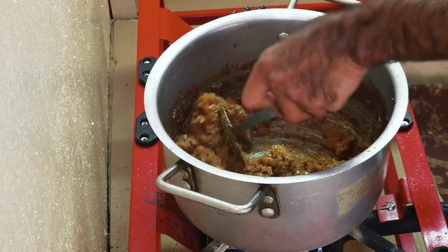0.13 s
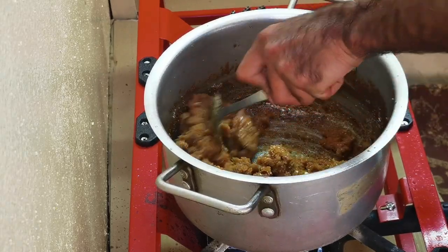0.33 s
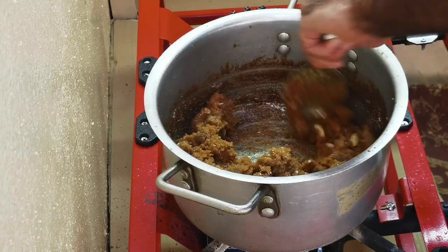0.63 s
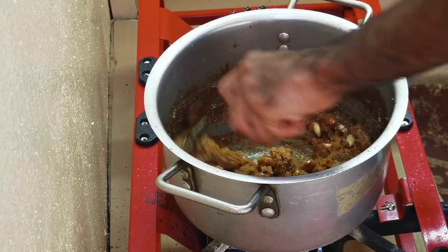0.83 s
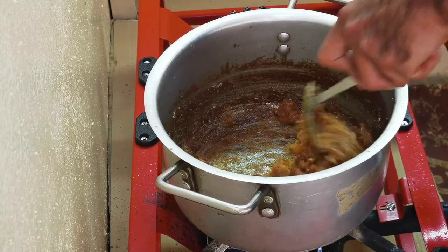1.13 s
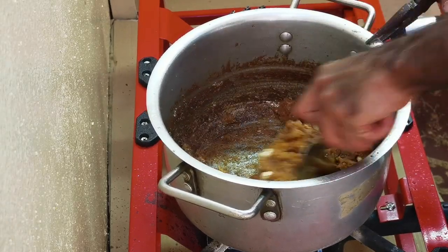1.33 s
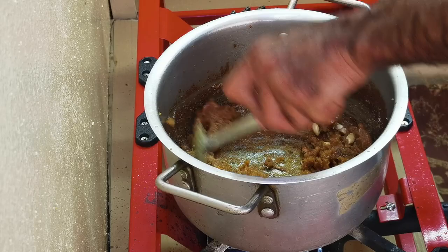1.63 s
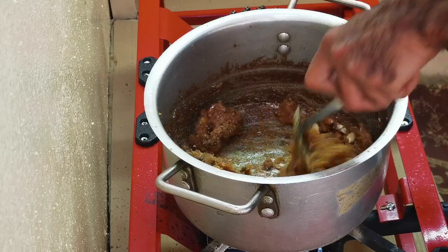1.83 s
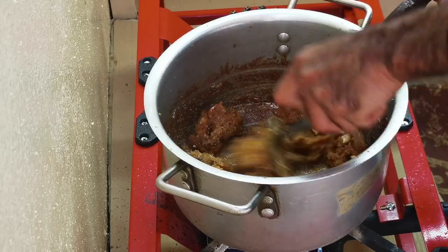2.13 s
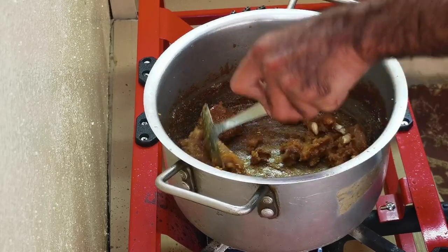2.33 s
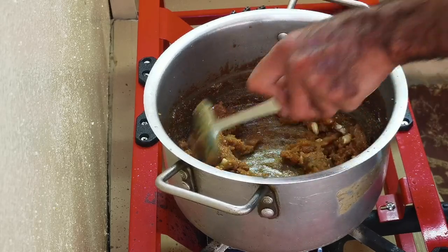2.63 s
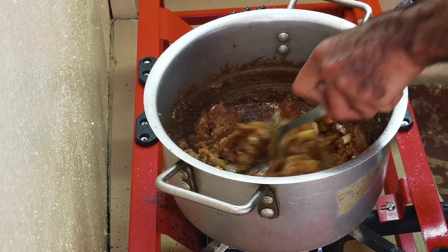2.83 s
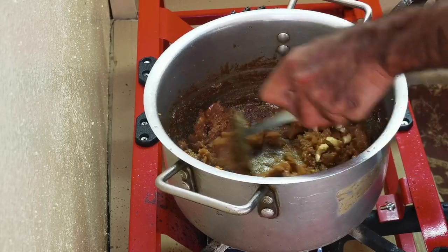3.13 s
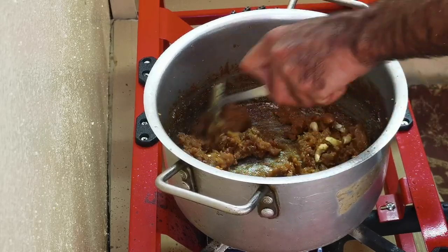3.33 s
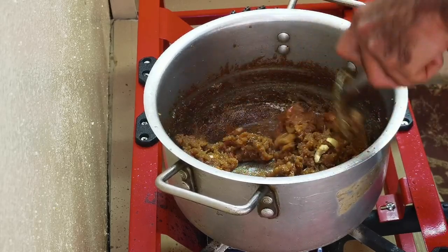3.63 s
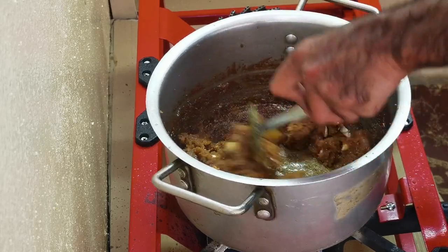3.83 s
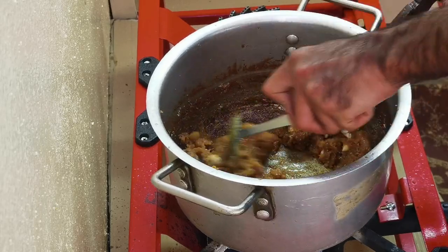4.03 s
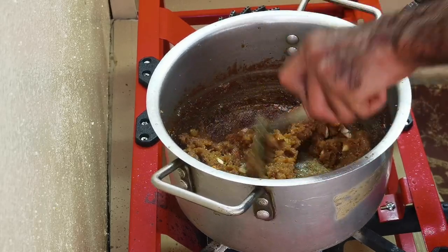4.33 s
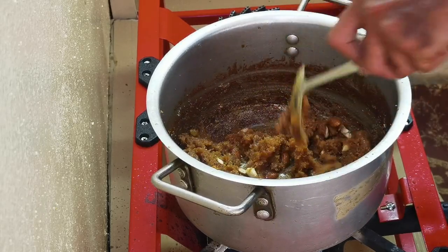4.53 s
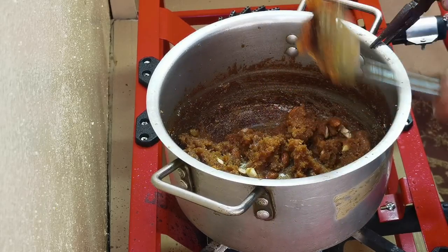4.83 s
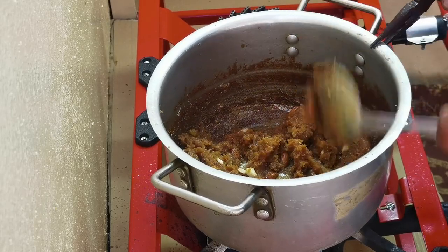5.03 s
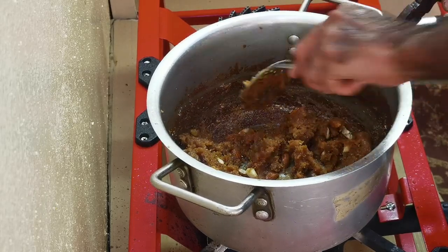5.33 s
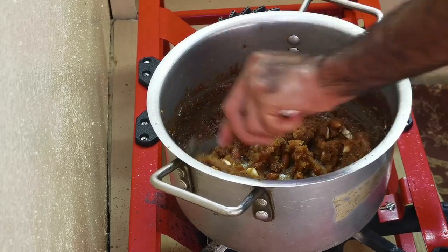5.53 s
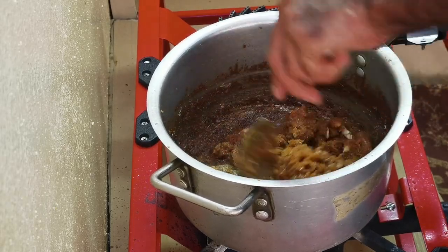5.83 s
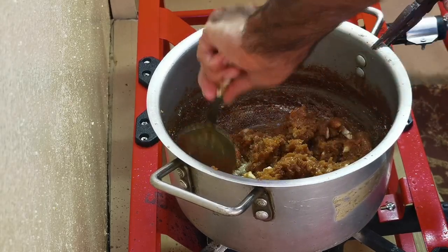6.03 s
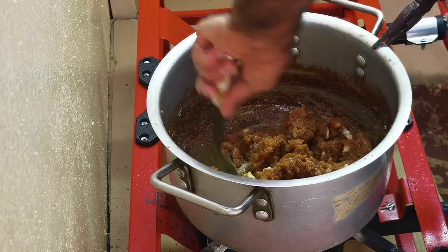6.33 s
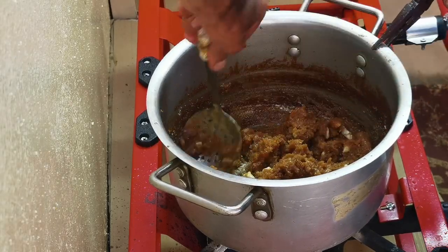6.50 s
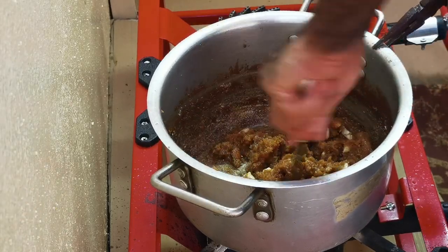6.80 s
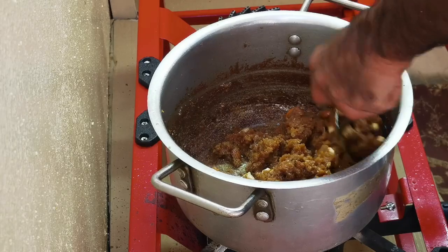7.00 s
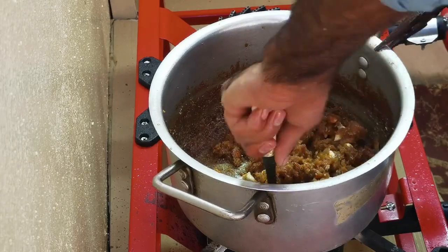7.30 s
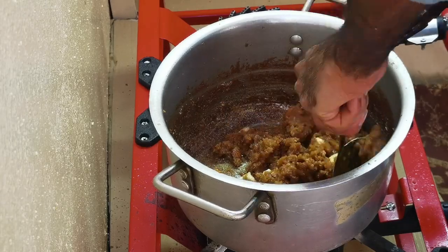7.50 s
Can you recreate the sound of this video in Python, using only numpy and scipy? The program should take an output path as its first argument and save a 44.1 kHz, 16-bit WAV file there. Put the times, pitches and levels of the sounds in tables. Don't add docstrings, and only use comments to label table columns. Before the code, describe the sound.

Thick paste fries in a metal pot, hissing and spitting over a low gas roar. A metal spoon begins with a rapid cluster of firm thuds, drags along the base and knocks in bursts, jolting the pot on its stand. Two hard rim clanks ring out late, then quieter frying carries scuffs, short metallic slides and gritty ticks. Close microphone, pot slightly left, short hard-room reflections.

```python
import sys
import numpy as np
from scipy import signal
from scipy.io import wavfile

SR = 44100
rng = np.random.default_rng(int(sys.argv[2]) if len(sys.argv) > 2 else 0)


def int16_out(signal):
    q = np.round(np.clip(np.atleast_2d(signal).T, -1, 1) * 32767)
    wavfile.write(sys.argv[1], SR, q.astype(np.int16))


def invert_db(x):
    u = np.asarray(x, float) / 20
    return 10 ** u


N = 337806
SIDES = np.array([[1], [-1]])

# pitch_hz, level_db (per Hz)
FLAME_SPECTRUM = [(13, -35), (22, 25), (97, 28), (124, 7), (166, -39.5), (263, -31), (300, -13), (390, -29),
                  (660, -120)]
FLAME_DB = -50.5

# pitch_hz, left_minus_right_db
LEAN = [(60, -1.5), (180, 0), (550, -6), (1650, 4.5), (4970, 0.5), (15000, 1)]
# pitch_hz, likeness (0 to 1)
LIKENESS = [(60, 1), (130, 0.95), (290, 0.9), (640, 0.96), (1410, 0.6), (3100, 0.79), (6000, 0.82),
            (9000, 0.74), (15000, 0.85)]

# time_s, level_db
HEAT = [
    (0, -44),
    (1.4, -40),
    (3.0, -47),
    (4.1, -43.5),
    (4.95, -48),
    (5.5, -51.5),
    (7.66, -47.5),
]
# peak_s, rise_s, fall_s, sizzle_db, spit_db
FLARES = [(.1, 0.048, 0.051, -31.5, -62), (.21, 0.11, 0.024, -33, -33), (.62, 0.48, 0.12, -37.5, -36.5),
          (.88, 0.011, 0.21, -35.5, -54), (1.62, 0.16, 0.37, -38.5, -69), (2.2, 0.19, 0.78, -41.5, -56),
          (2.92, 0.085, 0.06, -40, -60), (3.2, 0.077, 0.062, -36, -36.5), (3.54, 0.13, 0.1, -37, -46),
          (3.88, 0.02, 0.025, -30.5, -61), (5.03, 0.012, 0.2, -31, -52), (5.18, 0.19, 0.037, -37.5, -39),
          (5.24, 0.011, 0.14, -34, -42), (5.565, 0.0026, 0.018, -38.5, -44),
          (7.146, .004, 0.019, -39.5, -43), (7.31, 0.0041, 0.023, -42, -61), (5.79, 0.14, 0.057, -36, -46),
          (5.578, .004, 0.018, -48, -50), (6.08, 0.011, 0.093, -41, -68), (6.29, 0.069, 0.064, -37, -36.5),
          (6.47, 0.021, 0.093, -34, -39), (6.55, 0.052, 0.049, -35, -31), (6.81, 0.14, 0.13, -38, -38.5),
          (6.97, 0.18, 0.27, -39.5, -69), (7.52, 0.058, 0.1, -36.5, -40), (7.6, 0.035, 0.04, -34.5, -55)]
# pitch_hz, level_db (per Hz)
SIZZLE = [(710, -38.5), (1200, -55), (1430, -7), (1600, 1), (2040, 0), (2400, -1), (2870, -0.5),
          (3820, 1.5), (4910, 1), (6250, 4.5), (7520, -8.5), (9310, -50), (11000, -13), (14300, -48),
          (22000, -120)]
# pitch_hz, level_db (per Hz)
SPIT = [(6180, 16.5), (10500, 1), (11300, -5.5), (12600, 12), (13800, 6), (15100, 9), (15800, -5)]
# pitch_hz, level_db, t60_s
HOLLOW = [(1010, -2.5, 0.075), (1490, 4.5, 0.031), (1937, 2.5, 0.038), (2075, -4, 0.061)]
HOLLOW_DB = -11

# pitch_hz, level_db, t60_s
WALL = [(290, -10, 0.021), (308, -5.5, 0.19), (345, -9, 0.32), (403.3, 6.5, 0.1), (449, -1, 0.12),
        (499, 6, 0.068), (532.3, 6.5, 0.13), (630, -8, 0.038), (690, -8.5, 0.048)]
# pitch_hz, level_db, t60_s
UPPER = [(768.5, -8, 0.21), (850, 7.5, 0.02), (914, -11, 0.25), (1011, 10.5, 0.069), (1134, -11, 0.12),
         (1234, -6, 0.18), (1347, 4, 0.052), (1475, -0.5, 0.13), (1538, -8, 0.11), (1733, 0.5, 0.034),
         (2000, 1, 0.078), (2383, 4, 0.038)]
# pitch_hz, level_db, t60_s
STAND = [(59, -27, 0.42), (70.4, -2.5, 0.17), (101.6, -6.5, 0.72), (142.6, -12.5, 0.37), (105.24, -6, 0.97),
         (163.5, -18, 0.43), (172.4, -10.5, 0.59), (199.1, -10, 0.23)]

# time_s, level_db
PRESS = [
    (0, -43.5),
    (2.9, -44.5),
    (4.8, -48.5),
    (6.0, -47.5),
    (6.45, -48),
    (6.6, -58),
    (6.75, -47),
    (7.66, -56),
]
# peak_s, rise_s, fall_s, low_wall_db, upper_wall_db
PULLS = [(.17, 0.057, 0.053, -23, -32), (1.07, 0.23, 0.1, -38.5, -42.5), (1.45, 0.071, 0.13, -33.5, -39),
         (1.75, 0.036, 0.16, -40, -38.5), (2.22, 0.052, 0.16, -29.5, -37), (2.62, 0.16, 0.12, -30.5, -45.5),
         (4.05, 0.071, 0.39, -45.5, -48.5), (5.235, 0.03, 0.038, -25.5, -38), (5.4, 0.22, 0.1, -41.5, -40),
         (6.1, 0.07, 0.52, -39, -52), (6.98, 0.25, 0.4, -42.5, -47.5), (7.57, 0.14, 0.26, -34, -43)]
LOW_PRESS_DB, UPPER_PRESS_DB = -4, -57.5
# peak_s, rise_s, fall_s, level_db
ROCKS = [(.25, .08, 0.16, -31), (1.45, 0.27, 0.5, -26.5), (1.69, 0.24, 0.3, -53), (2.49, 0.14, 0.92, -48),
         (4.05, 0.054, 0.059, -19), (4.5, .2, 0.23, -60), (5.26, 0.079, 0.12, -16.5),
         (5.72, 0.15, 0.27, -33.5), (6.13, 0.038, 0.3, -32), (7.0, 0.45, 0.77, -34.5),
         (7.45, 0.26, 0.13, -25.5)]
STAND_REST_DB = -53

# middle_s, length_s, level_db (rms), centre_hz
SCUFFS = [(0.185, 0.06, -18, 486), (0.447, 0.2, -28.5, 2170), (0.612, 0.16, -35.5, 477),
          (0.982, 0.37, -38, 2000), (1.091, 0.039, -24, 517), (1.644, 0.1, -22.5, 500),
          (1.514, 0.043, -28.5, 485), (1.444, 0.031, -25, 480), (2.22, 0.03, -13.5, 456),
          (2.648, 0.23, -30.5, 440), (2.849, 0.05, -35, 1060), (3.216, 0.083, -29, 405),
          (3.528, 0.26, -43, 850), (3.937, 0.26, -24, 433), (5.127, 0.097, -32.5, 1030),
          (5.31, 0.076, -23, 490), (5.787, 0.2, -25, 483), (5.777, 0.11, -29.5, 1300),
          (6.088, 0.038, -20.5, 1200), (6.287, 0.064, -26.5, 860), (6.493, 0.19, -41, 1320),
          (6.829, 0.091, -17.5, 756), (7.063, 0.051, -25, 447), (7.491, 0.034, -33, 1880),
          (7.592, 0.066, -32, 1920), (6.937, 0.11, -36, 2310)]
SLIDE = 0.25

# start_s, length_s, level_db
SINGS = [(0.097, 0.032, -20), (0.14, 0.031, -30.5), (5.03, 0.023, -17.5), (5.195, 0.025, -19.5),
         (4.898, 0.053, -47), (4.727, 0.087, -50.5), (1.581, 0.021, -31), (1.61, 0.016, -28.5),
         (1.421, 0.023, -33), (5.66, 0.07, -49), (5.99, 0.036, -54), (7.407, 0.018, -22),
         (2.495, .05, -40.5), (5.091, 0.049, -28), (5.213, 0.095, -29), (5.348, 0.055, -34),
         (6.359, 0.043, -48), (6.444, 0.054, -29.5), (6.497, 0.12, -40), (6.787, 0.065, -27.5),
         (6.832, 0.043, -33), (6.918, 0.028, -40), (7.052, 0.041, -29.5), (7.304, 0.055, -40.5),
         (7.473, 0.057, -30.5), (7.552, 0.033, -27), (7.601, 0.019, -26.5), (7.607, 0.021, -32.5),
         (7.648, 0.033, -38.5)]
# pitch_hz, level_db, t60_s
SING_MODES = [(1007.5, -4.5, 0.15), (1036, -4.5, 0.073), (1465, -16, 0.02), (2000, -23, 0.014)]

GLIDE_STARTS = [.055, 3.88, 5.05, 5.06, 5.73, 5.785, 6.085, 6.1, 6.27, 6.275, 6.46, 6.795, 6.8, 7.575, .096,
                .162, 2.203, 2.445, 2.573, 5.65, 6.47, 6.22, 6.08, 6.615]
# length_s, level_db, from_hz, to_hz
GLIDES = [(0.025, -37, 1470, 1480), (0.032, -38, 1200, 1200), (0.059, -33.5, 349, 324),
          (0.072, -34, 250, 216), (0.0415, -34, 600, 1100), (0.065, -30, 420, 280), (0.078, -42, 1260, 640),
          (0.073, -36, 193, 165), (0.063, -32.5, 1100, 1200), (0.055, -27, 500, 604),
          (0.0408, -36, 330, 303), (0.06, -23, 800, 640), (.07, -31.5, 1300, 1150),
          (0.056, -43, 4200, 4600), (0.0128, -31, 1900, 1900), (0.041, -40, 1900, 1850),
          (.03, -39, 2100, 1250), (0.099, -43.5, 2000, 2000), (0.043, -38.5, 2000, 1450),
          (0.13, -59, 2050, 1700), (.04, -51, 1200, 1100), (0.061, -49, 1350, 1300),
          (0.027, -42, 1400, 1500), (0.028, -44, 1450, 1400)]
GLIDE_WIDTH = 0.073

# start_s, peak_db, rattle_length_s
CLANKS = [(0.873, -33, 0.0092), (2.191, -30.5, 0.026), (2.573, -22, 0.005), (3.883, -27, 0.006),
          (1.425, -26, .008), (2.206, -31, .005), (5.02, -20, .012), (5.178, -15, 0.014),
          (5.284, -20, 0.015), (5.03, -8, 0.013), (5.187, -7.5, 0.015)]
# start_s, peak_db, length_s
TICKS = [(6.0026, -35, 0.003), (6.078, -30, 0.003), (6.25, -33, 0.003), (6.286, -18, 0.0034),
         (6.4147, -31, 0.003), (6.454, -19, 0.003), (6.805, -23, 0.003), (7.155, -35, 0.003),
         (7.168, -27, 0.003), (7.309, -34, 0.003), (7.344, -31, 0.003), (7.411, -25, 0.0034),
         (7.482, -30, 0.003)]
TICK_DB = -3
# pitch_hz, level_db (per Hz)
CRACK = [(1500, -28), (2300, -32), (2900, -22), (3400, 13.5), (3800, -5), (5400, 3.5), (6400, -5),
         (7200, -17), (9500, -11), (11000, -23), (12500, -16), (14000, -18), (15200, -15), (15800, -22)]
# pitch_hz, level_db, t60_s
RIM = [(2510, -7.5, 0.1), (2720, -24, 0.33), (3170, -10.5, 0.22), (3430, -2, 0.066), (3720, -6.5, 0.18),
       (3970, -9.5, 0.22), (4430, -1, 0.082), (4670, -27, 0.24), (4840, -11, 0.2), (5130, -2, 0.035),
       (5350, -0.5, 0.047), (5970, -0.5, 0.07), (6240, -1.5, 0.083), (7220, -4, 0.086)]
# pitch_hz, level_db, t60_s
BELL = [(998, 4.5, 0.35), (1030, -10, 0.3), (1210, -4, 0.38), (1534, 3, 0.34), (1563, -10, 0.18),
        (1710, -1, 0.19), (2940, -11, 0.32), (3150, -13, .25), (3400, 5, 0.12), (3400, -6, 0.17),
        (3880, -11, 0.14), (4300, -13, .2), (4880, -7, 0.2), (5227, -15, 0.31), (5700, -8, 0.2),
        (6290, 5, 0.085), (6460, -19, 0.34)]
BELL_DB = -40.5
HALO_DB, HALO_T60_S, HALO_LOW_HZ, HALO_HIGH_HZ = -63.5, 0.77, 2996, 6890

# start_s, peak_db, centre_hz,
# brightness_db
KNOCKS = [(0.099, -1, 533, -10), (0.132, -1.5, 520, -17), (0.151, -4.5, 540, -9), (0.179, -11, 537, -16),
          (1.263, -9, 535, -12), (1.425, -8, 493, -12), (1.609, -4, 542, -4), (1.643, -10, 497, -5),
          (1.747, -7.5, 358, -12), (2.206, -8, 530, 0), (2.226, -12, 510, -33), (2.283, -3, 520, -11),
          (2.314, -8.5, 390, -10), (2.575, 0.5, 483, -9), (3.881, -6.5, 550, -0.5), (3.926, -4, 455, -12),
          (3.951, -1.5, 442, -22), (5.033, -15, 1060, 3), (5.16, -9, 510, -3.5), (5.193, -9, 1010, -1.5),
          (5.265, -2.5, 500, -20), (5.775, -5, 482, -11), (6.079, -11, 483, 2.5), (6.297, -17, 577, -8),
          (6.818, -13, 780, -18), (7.011, -13, 549, -7), (7.171, -9.5, 553, -5.5), (7.409, -6.5, 560, -5),
          (7.432, -7.5, 508, -37),
          (0.077, -19, 319, 2), (0.527, -19, 1380, -19), (0.622, -23.5, 414, 5.5), (1.069, -17, 380, -12),
           (1.442, -21, 455, -25), (1.794, -24, 516, -29), (2.702, -26.5, 423, -29), (2.943, -27, 460, -30),
           (3.209, -21, 385, 2), (3.829, -19.5, 514, -38), (4.001, -15, 480, -18), (4.49, -16, 392, -8),
           (5.032, -12, 343, -30), (5.19, -9.5, 330, -30), (5.29, -13, 555, -4), (5.21, -13, 500, -23),
           (5.312, -25, 504, -9), (5.383, -22.5, 500, -2), (5.728, -16, 507, -3.5), (5.746, -17, 458, 4.5),
           (5.795, -14.5, 460, -20), (5.812, -25, 410, -23), (6.093, -13, 470, -16), (6.129, -22, 386, -23),
           (3.96, -3.5, 525, -10), (3.79, -30, 347, -30), (5.445, -28, 470, -9), (.193, -16, 514, -18),
           (5.87, -18, 462, -12), (6.424, -29, 463, 4), (6.509, -28, 1280, -22), (6.55, -27, 1445, -17),
           (7.149, -29, 1380, -7), (7.2, -19.5, 474, -21), (2.612, -15, 463, -25), (2.629, -29, 490, -25),
           (6.543, -23, 1390, -25), (6.613, -32, 1490, 4), (6.726, -20, 1363, -14), (6.783, -25, 1300, -3),
           (7.061, -23, 490, -9), (7.313, -54, 1010, 18), (7.355, -25, 362, -5), (7.487, -24.5, 566, -20)]
# start_s, level_db
JOLTS = [(0.083, -13.5), (0.136, -7), (0.185, -10), (0.622, -21), (1.264, -21), (1.614, -14), (1.65, -18),
         (2.209, -9), (2.289, -12), (2.32, -14.5), (2.577, -20), (2.708, -31), (3.212, -38), (3.834, -24),
         (3.885, -11.5), (3.93, -7.5), (3.965, -20), (4.497, -24.5), (5.037, -14.5), (5.166, -13),
         (5.271, -16), (6.298, -24), (7.177, -17), (7.412, -18), (7.438, -21)]

KITCHEN_T60_S, WALL_CUT_HZ = 0.47, 12000


def rms_one(x):
    return x / np.sqrt(np.mean(x ** 2) + 1e-20)


def highpass(x, cut_hz):
    return signal.sosfilt(signal.butter(2, cut_hz, "high", fs=SR, output="sos"), x)


def in_time(rows):
    s, level = np.transpose(rows)
    return np.interp(np.arange(N) / SR, s, level)


def at_hz(points, hz):
    points_hz, level = np.transpose(points)
    return np.interp(np.log(hz), np.log(points_hz), level)


def swells(rows, column, rest_db):
    t, rows = np.arange(0, N + 50, 50) / SR, np.array(rows)
    late = t - rows[:, :1]
    drop_db = 10 * np.maximum(-late / rows[:, 1:2], late / rows[:, 2:3])
    level_db = rows[:, column, None] - drop_db
    power = np.interp(np.arange(N) / SR, t, np.sum(invert_db(2 * level_db), axis=0))
    return 10 * np.log10(power + invert_db(2 * rest_db))


def drift(rate_hz):
    r = np.exp(-2 * np.pi * rate_hz * 40 / SR)
    noise = rng.standard_normal(N // 40 + 2002)
    slow = signal.lfilter([1], [1, -2 * r, r * r], noise)[2000:]
    return np.interp(np.arange(N) / 40, np.arange(len(slow)), rms_one(slow))


def grains(per_s, spread_db):
    sizes = invert_db(spread_db * np.minimum(rng.exponential(1, N), 5))
    signs = rng.choice([-1, 1], N)
    return sizes * signs * (rng.random(N) < per_s / SR)


def ring(clicks, hz, t60):
    r, w = invert_db(-60 / (t60 * SR)), 2 * np.pi * hz / SR
    return signal.lfilter([0, np.sin(w)], [1, -2 * r * np.cos(w), r * r], clicks + 1e-18)


def coloured(draw, spectrum, patchy_db, count=3):
    low_hz, high_hz = spectrum[0][0], min(spectrum[-1][0], 0.45 * SR)
    edges = np.geomspace(low_hz, high_hz, int(count * np.log2(high_hz / low_hz)) + 2)
    pairs, out = [[draw(), draw()], [draw(), draw()]], 0
    for k, (low, high) in enumerate(zip(edges, edges[1:])):
        band = signal.butter(3, [low, high], "band", fs=SR, output="sos")
        middle, side = signal.sosfilt(band, pairs[k % 2])
        hz = np.sqrt(low * high)
        alike = np.clip(at_hz(LIKENESS, hz), 0, 1) ** 2
        gain = invert_db(at_hz(spectrum, hz) + patchy_db * drift(20.8)) * invert_db(at_hz(LEAN, hz) / 2 * SIDES)
        out = out + gain * (np.sqrt(1 + alike) * middle + np.sqrt(1 - alike) * side * SIDES)
    return rms_one(out)


def rub(modes, per_s, spread_db, level_db):
    slips = grains(per_s, spread_db) * invert_db(2 * drift(16) + level_db)
    dealt, out = rng.integers(0, len(modes), N), np.zeros(N)
    for k, (hz, db, t60) in enumerate(modes):
        out += invert_db(db) * ring(slips * (dealt == k), hz, t60 * 0.77)
    return out * np.sqrt(np.mean(invert_db(level_db) ** 2) / np.mean(out ** 2))


def favour(modes, centre_hz, db_oct):
    octaves = np.abs(np.log2(np.array(modes)[:, 0] / centre_hz[:, None]))
    return -db_oct * octaves ** 1.29


def strike(modes, s, strength_db, rise_cycles):
    at, out = np.round(s * SR).astype(int), np.zeros(N)
    scatter_db = 3 * rng.standard_normal((len(s), len(modes)))
    for k, (hz, level_db, t60) in enumerate(modes):
        clicks = np.zeros(N)
        clicks[at] = (-1) ** k * invert_db(strength_db[:, k] + level_db + scatter_db[:, k])
        swell = ring(clicks, hz, rise_cycles / hz) * 2 * np.log(1000) * hz / (rise_cycles * SR)
        out += ring(swell, hz, t60)
    return out


def kitchen(x):
    out, dull = np.zeros((2, N)), np.exp(-2 * np.pi * WALL_CUT_HZ / SR)
    lags = (rng.uniform(0.011, 0.03, 12) * SR).astype(int)
    for k, lag in enumerate(lags):
        loop, gain, state = x.copy(), invert_db(-60 * lag / SR / KITCHEN_T60_S), [0.]
        for i in range(lag, N, lag):
            back, state = signal.lfilter([gain * (1 - dull)], [1, -dull], loop[i - lag:i], zi=state)
            loop[i:i + lag] += back[:N - i]
        out[k % 2] += (loop - x) * (-1) ** (k // 2)
    return out


def flame():
    return invert_db(FLAME_DB) * coloured(lambda: rng.standard_normal(N), FLAME_SPECTRUM, patchy_db=3)


def frying():
    heat_db = in_time(HEAT)
    sizzle_db = swells(FLARES, column=3, rest_db=heat_db)
    spit_db = swells(FLARES, column=4, rest_db=heat_db - 1)

    def pops():
        return rms_one(grains(5000, spread_db=3.0)) + 0.29 * rng.standard_normal(N)

    sizzle = invert_db(sizzle_db - 2.0) * coloured(pops, SIZZLE, patchy_db=3.0)
    spit = invert_db(spit_db - 5.5) * coloured(pops, SPIT, patchy_db=3.5, count=7)
    metal_middle = rub(RIM, 1500, 2.6, sizzle_db - 10.5)
    metal_side = rub(RIM, 1500, 3.5, sizzle_db - 18.0)
    hum = rub(HOLLOW, 3000, 2.3, sizzle_db + HOLLOW_DB)
    return sizzle + spit + metal_middle + hum + metal_side * SIDES


def drag():
    press_db = in_time(PRESS)
    low_db = swells(PULLS, column=3, rest_db=press_db + LOW_PRESS_DB)
    upper_db = swells(PULLS, column=4, rest_db=UPPER_PRESS_DB + press_db - press_db.mean())
    stand_db = swells(ROCKS, column=3, rest_db=STAND_REST_DB)
    low = rub(WALL, 1200, 2.2, low_db - 0.1)
    stand = rub(STAND, 400, 2.2, stand_db - 6.5)
    return low + stand, rub(UPPER, 4000, 2.2, upper_db - 0.1)


def scuffs():
    modes, t, out = WALL + UPPER, np.arange(N // 20 + 1) * 20 / SR, np.zeros(N)
    s, length, level_db, centre_hz = np.transpose(SCUFFS)
    weights = invert_db(level_db[:, None] + favour(modes, centre_hz, 24.0))
    grit, dealt = rms_one(grains(5000, 2.6)), rng.integers(0, len(modes), N)
    for k, (hz, db, t60) in enumerate(modes):
        delay = SLIDE * np.log2(hz / centre_hz)[:, None] + 0.1
        late = (t - s[:, None]) / length[:, None] + delay
        bumps = np.exp(-np.where(late < 0, 18, 5.5) * late ** 2)
        push = np.repeat(weights[:, k] @ bumps, 20)[:N] * grit * (dealt == k)
        out += invert_db(db * 0.84 - 15.5) * ring(push, hz, t60 * 0.54)
    return highpass(out, 240)


def sings():
    t, push, out = np.arange(N) / SR, np.zeros(N), np.zeros(N)
    for s, length, level_db in SINGS:
        part = slice(int(s * SR), int((s + length) * SR))
        u = np.clip((t[part] - s) / length, 0, 1)
        push[part] += invert_db(level_db) * np.sin(np.pi * u) ** 0.62
    for hz, db, t60 in SING_MODES:
        even_power = np.sqrt(4 * np.log(1000) / (t60 * SR))
        out += invert_db(db) * even_power * ring(push * rms_one(grains(3000, 3.6)), hz, t60)
    return out


def glides():
    out = np.zeros(N)
    for s, (length, level_db, from_hz, to_hz) in zip(GLIDE_STARTS, GLIDES):
        u = np.arange(int(length * SR)) / (length * SR)
        phase = 2 * np.pi * np.cumsum(from_hz * (to_hz / from_hz) ** u) / SR
        sos = signal.butter(2, GLIDE_WIDTH * np.sqrt(from_hz * to_hz), fs=SR, output="sos")
        wobble = signal.sosfilt(sos, rng.standard_normal((2, SR // 2)))
        a, b = rms_one(wobble[:, -len(u):])
        tone = (a + 1) * np.cos(phase) + b * np.sin(phase)
        out[int(s * SR):][:len(u)] += invert_db(level_db) * np.sin(np.pi * u ** 0.67) * tone
    return out


def clanks():
    t, rattle = np.arange(SR // 2) / SR, np.zeros(N + SR)
    ticks = [(s, db + TICK_DB, length) for s, db, length in TICKS]
    for s, peak_db, length in CLANKS + ticks:
        age = np.minimum(t / length, 40)
        rattle[int(s * SR):][:len(t)] += invert_db(peak_db) * np.minimum(age * 2, 1) * np.exp(-age * 1.7)
    rattle = rattle[:N]

    def hits():
        return rms_one(grains(6000, 3))

    rim = np.array([ring(rattle * hits(), hz, t60) * invert_db(db) for hz, db, t60 in RIM])
    lean = invert_db(2.5 * rng.standard_normal(len(RIM)) * SIDES)
    crack = rattle * coloured(hits, CRACK, 0, count=4)
    return invert_db(-36.0) * lean @ rim + invert_db(-2.0) * crack


def bell():
    s, peak_db, length = np.transpose(CLANKS[-2:])
    halo_hz = HALO_LOW_HZ * (HALO_HIGH_HZ / HALO_LOW_HZ) ** rng.random(110)
    halo = [(hz, HALO_DB - BELL_DB, HALO_T60_S * invert_db(2 * rng.standard_normal())) for hz in halo_hz]
    start, out = int(s[0] * SR), np.zeros((2, N))
    at = ((s + length / 2) * SR).astype(int) - start
    for hz, db, t60 in BELL + halo:
        clicks, chance = np.zeros(SR), rng.standard_normal(3)
        clicks[at] = invert_db(peak_db + db + BELL_DB + 16.5 + 4.4 * chance[:2])
        lean = invert_db((1.0 + 5.6 * chance[2]) * SIDES)
        out[:, start:start + SR] += lean * ring(clicks, hz, t60)
    return out


def thuds(s, peak_db, centre_hz, cycles):
    out, t = np.zeros(N + SR // 5), np.arange(SR // 5) / SR
    for at, db, hz in zip(s, peak_db, centre_hz):
        age = t * hz / (cycles * invert_db(-0.12 * (db + 19.5)))
        shape = age * np.exp(1 - age) * np.sin(2 * np.pi * hz * t * (1 - 0.3 * t))
        out[round(at * SR):][:len(t)] += invert_db(db) * shape
    return out[:N]


def knocks():
    s, peak_db, centre_hz, upper_db = np.transpose(KNOCKS)
    jolt_s, jolt_db = np.transpose(JOLTS)
    low_db = peak_db[:, None] - 20.0 + favour(WALL, centre_hz, 2.6)
    high_db = (peak_db + upper_db)[:, None] - 13.0 + favour(UPPER, centre_hz, 8.66)
    stand_db = jolt_db[:, None] - 11.0 + np.zeros(len(STAND))
    low = strike(WALL, s, low_db, rise_cycles=1.3)
    high = strike(UPPER, s, high_db, rise_cycles=12.0)
    stand = strike(STAND, jolt_s, stand_db, rise_cycles=5)
    wall = highpass(low + thuds(s, peak_db - 5.5, centre_hz, cycles=1.64), 210)
    return wall + stand, high


def scene():
    low_knock, high_knock = knocks()
    low_rub, high_rub = drag()
    low = low_knock + low_rub + scuffs()
    high = high_knock + high_rub + sings() + glides()
    metal = clanks() + bell()
    pot = low * invert_db(0.37 * SIDES) + high * invert_db(1.83 * SIDES) + metal
    room = invert_db(-23.0) * kitchen(highpass(low + high + metal.mean(axis=0), 700))
    return pot + room + frying() + flame()


def roll_off(x):
    return signal.sosfilt(signal.butter(12, 16970, fs=SR, output="sos"), x)


def record(dry):
    bright = highpass(dry, 38)
    banded = signal.sosfilt(signal.ellip(10, 0.5, 60, 15800, fs=SR, output="sos"), bright)
    mix = 1.529 * np.tanh(banded / 1.524)
    return roll_off(mix)


dry = scene()
out = record(dry)
int16_out(out)
```